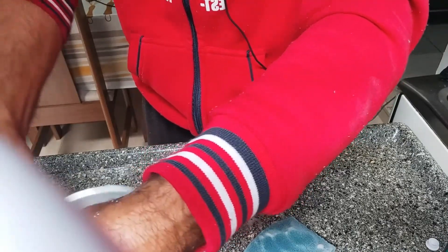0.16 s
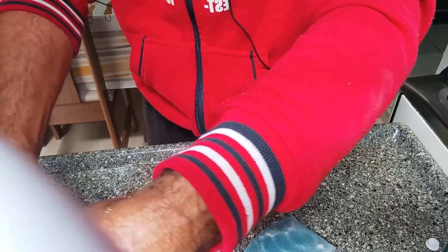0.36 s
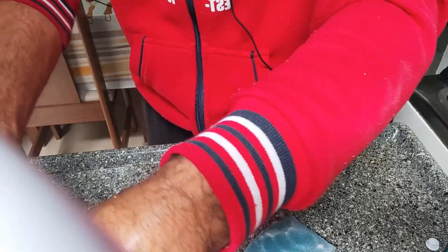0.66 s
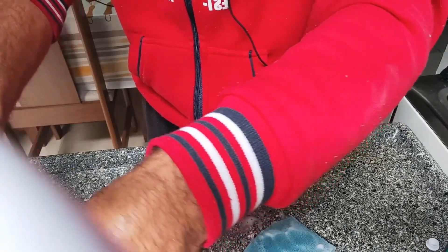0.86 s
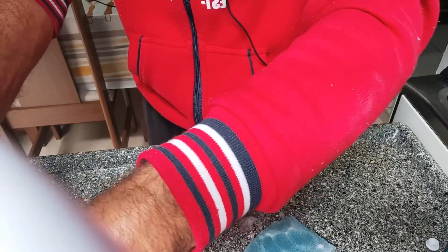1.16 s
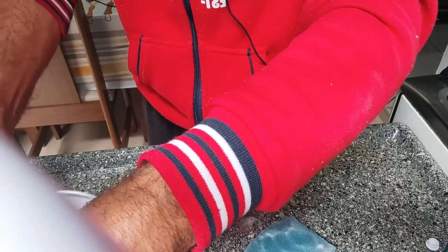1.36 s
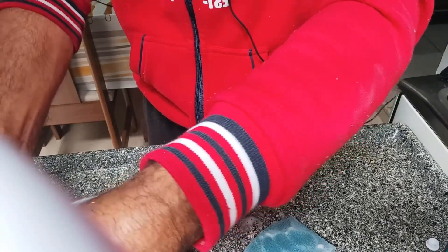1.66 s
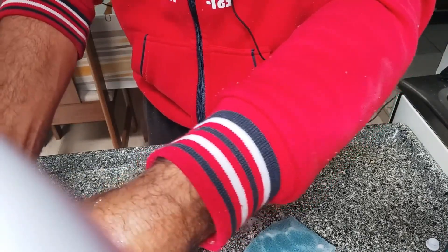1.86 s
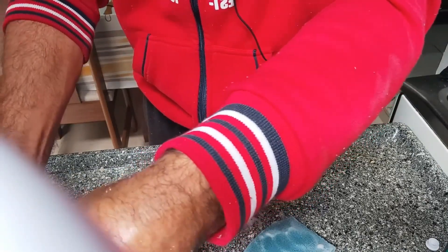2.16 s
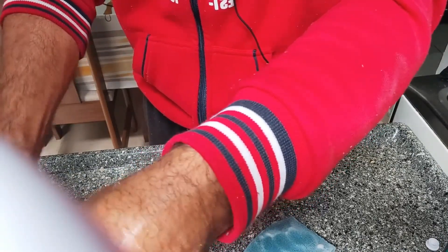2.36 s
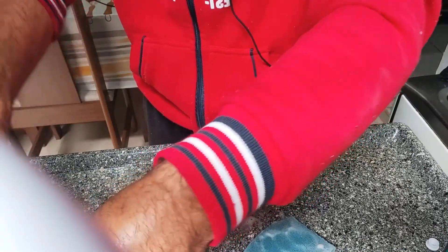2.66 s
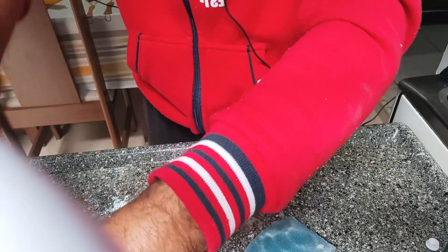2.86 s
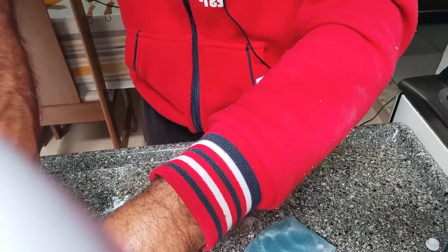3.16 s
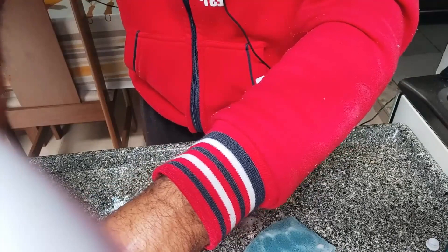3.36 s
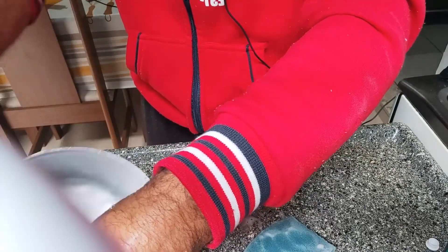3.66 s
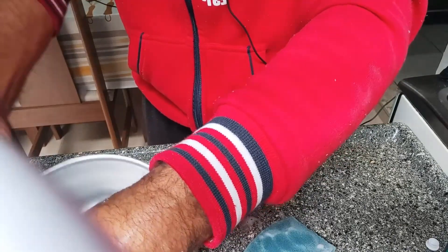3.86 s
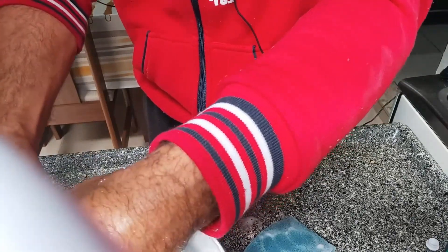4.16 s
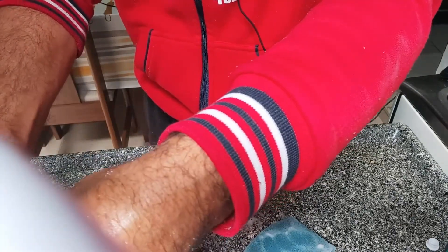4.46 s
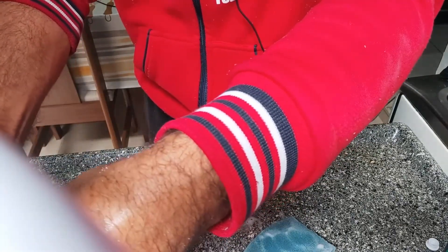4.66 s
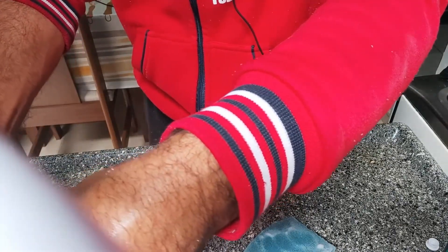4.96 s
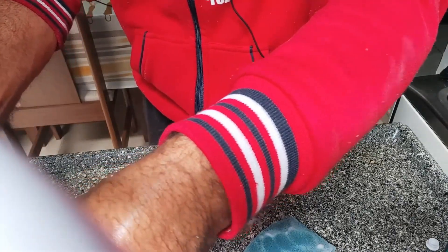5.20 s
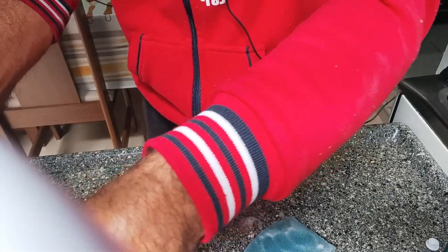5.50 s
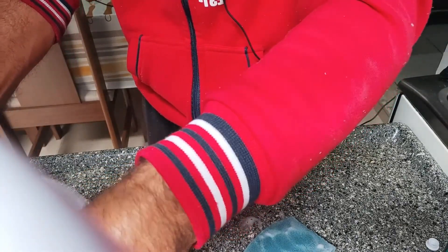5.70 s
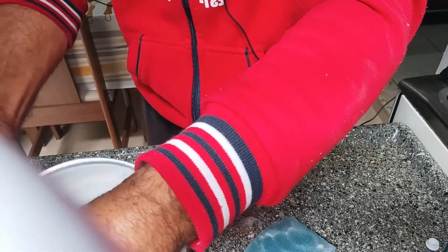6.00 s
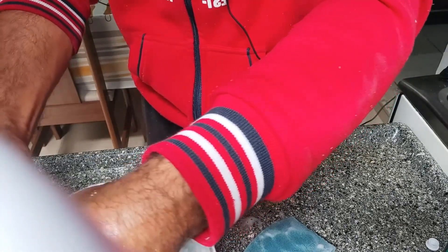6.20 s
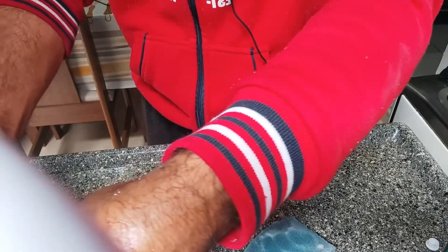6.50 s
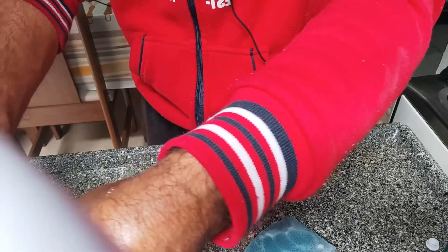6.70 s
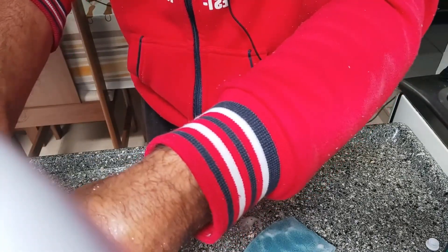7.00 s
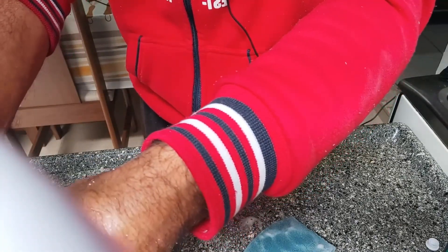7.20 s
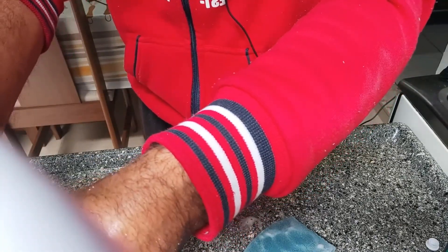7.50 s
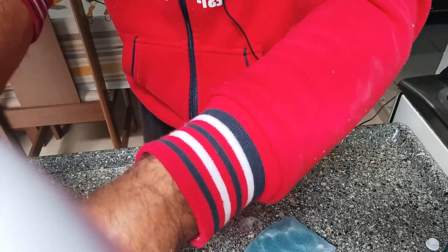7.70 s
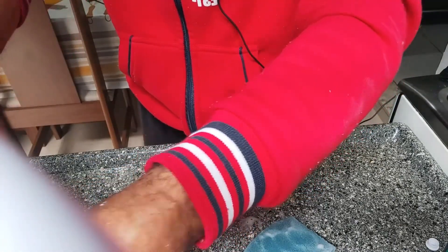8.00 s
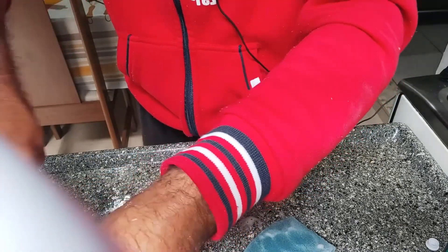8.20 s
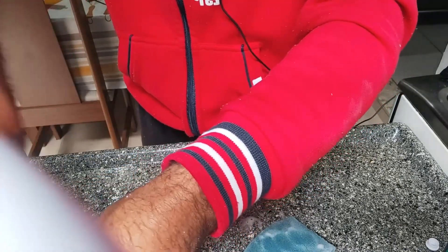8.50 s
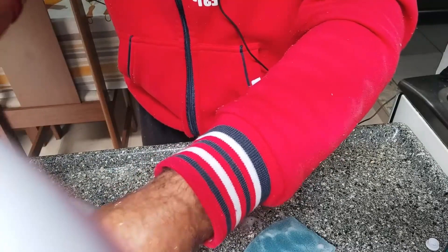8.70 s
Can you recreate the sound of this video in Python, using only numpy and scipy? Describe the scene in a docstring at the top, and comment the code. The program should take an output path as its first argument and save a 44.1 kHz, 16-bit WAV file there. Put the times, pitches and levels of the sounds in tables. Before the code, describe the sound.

A tap hisses into a steel kitchen sink while a scouring pad rasps over a metal pot and tipped water slops out twice.

```python
"""A running tap hisses into a steel kitchen sink while a pot is scoured, heard by two microphones.
The hiss is dense random clicks coloured for left and right; clicks through pot modes give the scouring pad.
The sink floor booms as a wavering tone, and clicks and noise through its modes patter and rumble.
Twice the pot is tipped: water slops out as clicks ringing bubble-sized resonances, with a spray of drops.
Plops and two longer rings of the sink near 474 Hz are single decaying sines."""
import sys
import numpy as np
from scipy import signal
from scipy.fft import rfft, irfft, next_fast_len
from scipy.io import wavfile
from scipy.ndimage import uniform_filter1d

SR = 44100
rng = np.random.default_rng(int(sys.argv[2]) if len(sys.argv) > 2 else 0)


def dump_mix(stems):
    """Bounce the given channels to the path in sys.argv[1] as a 16-bit WAV at rate SR."""
    frames = np.atleast_2d(stems).T  # one column per channel
    limited = np.clip(frames, -1, 1)  # hard clip at full scale
    pcm = np.round(limited * 32767).astype(np.int16)
    wavfile.write(sys.argv[1], SR, pcm)


N = 390285
T = np.arange(N) / SR
CUTOFF_HZ = 15700

# How hard the falling water drums on the sink floor. Each row: time in seconds, level in dB.
DRUMMING = [(0, -8), (.21, -17), (.27, -1.5), (.5, 1), (.62, -6.5), (1.25, -1.5), (2.03, 6.5), (2.3, 4.5),
            (2.75, 7.5), (3.1, 1.5), (3.53, 6.5), (4.2, 2), (4.3, -4), (4.8, -9.5), (6.25, -12.5),
            (7.5, -23), (8.85, -16)]
# Gushes of water from the tipped pot.
# Each row: start in seconds, length in seconds, level in dB, main bubble pitch in Hz.
GUSHES = [(2.982, 0.19, -50.5, 798), (3.191, 0.12, -53, 700), (3.329, 0.16, -50.5, 900),
          (3.483, 0.22, -53, 450), (3.72, .16, -60.5, 520), (8.377, .075, -52, 897),
          (8.497, 0.075, -50, 650), (8.671, .08, -49.5, 746)]
GUSH_ATTACK_S, GUSH_RELEASE_S = 0.023, 0.12


def from_db(db):
    """Decibels to gain."""
    return 10 ** (np.asarray(db) / 20)


def rms_one(x):
    """Scale to unit rms."""
    return x / np.sqrt(np.mean(x ** 2) + 1e-20)


def in_time(rows):
    """Each column of a curve at every sample."""
    s, *columns = np.transpose(rows)
    return [np.interp(T, s, c) for c in columns]


def at_hz(rows, hz):
    """Each column of a spectrum at the given frequencies, joined along log frequency."""
    points, *columns = np.transpose(rows)
    return np.array([np.interp(np.log(hz + 1), np.log(points), c) for c in columns])


def drift(rate):
    """Slow random wandering with unit rms; a higher rate in Hz wanders faster."""
    step = 40   # computed at every 40th sample
    r = np.exp(-2 * step * np.pi * rate / SR)
    noise = rng.standard_normal(N // step + 2002)
    slow = signal.lfilter([1], [1, -2 * r, r * r], noise)[2000:]   # drop the filter's start-up
    return np.interp(np.arange(N) / step, np.arange(len(slow)), rms_one(slow))


def grains(per_s, spread_db):
    """Random clicks of uneven size and either sign, at unit rms."""
    hits = np.flatnonzero(rng.random(N) < per_s / SR)
    sizes = rng.exponential(1, N)[hits]
    signs = np.sign(rng.random(N)[hits] - .5)
    clicks = np.zeros(N)
    clicks[hits] = signs * from_db(spread_db * np.minimum(sizes, 5))
    return rms_one(clicks) + 1e-18


def resonate(x, modes):
    """Parallel resonances (Hz, width Hz, dB) with alternating signs."""
    out = 0
    for k, (hz, width, db) in enumerate(modes):
        r = np.exp(-np.pi * width / SR)
        b = (1 - r * r) / 2 * np.array([1, 0, -1])
        a = [1, -2 * r * np.cos(2 * np.pi * hz / SR), r * r]
        out = out + (-1) ** k * from_db(db) * signal.lfilter(b, a, x)
    return out


def band(x, low_hz, high_hz):
    """Keep only what lies between two frequencies."""
    return signal.sosfilt(signal.butter(2, [low_hz, high_hz], "band", fs=SR, output="sos"), x)


def spread(mid, side, side_db, pan_db, lag_s=0):
    """Direct sound, late by lag_s at the left microphone, plus opposed scatter; positive pan is left."""
    direct = np.array([np.interp(T - lag_s, T, mid), mid])
    scatter = from_db(side_db) * side * np.array([[1], [-1]])
    return rms_one((direct + scatter) * from_db([[pan_db / 2], [-pan_db / 2]]))


def swells(rows, attack_s, release_s):
    """Gain over time of events (start, length, dB) that each rise, hold and fall."""
    power = np.zeros(N)
    for s, length, db in rows:
        span = slice(max(int(s * SR), 0), int((s + length + release_s) * SR))
        age = T[span] - s
        rise = np.clip(age / attack_s, 0, 1)
        fall = np.clip(1 - (age - length) / release_s, 0, 1)
        power[span] += (from_db(db) * rise * fall) ** 2
    return np.sqrt(power)


def bumps(rows, width_s):
    """Level in dB over time of brief rounded swells or dips (s, dB)."""
    return sum(db * np.exp(-((T - s) / width_s) ** 2) for s, db in rows)


def jet():
    """Countless tiny air bubbles burst in the stream and drops spatter, coloured for left and right."""
    # Broad colour of the hiss. Each row: Hz, left level in dB, right level in dB.
    hiss_colour = [(200, -102, -97), (460, -87.5, -90.5), (960, -92, -92.9), (1525, -87, -83),
                   (2240, -79.6, -79.5), (3900, -82, -75), (4540, -75.5, -75), (5390, -83.5, -77),
                   (6430, -91.5, -69.5), (7250, -80, -58), (8440, -70, -68), (9600, -85.5, -86.5),
                   (11400, -87.4, -87.3), (15000, -92, -92.5)]
    # Resonances in the hiss. Each row: Hz, width in Hz, left boost in dB, right boost in dB.
    hiss_peaks = [(2810, 120, 0.5, 3.5), (5090, 66, 4, 7.5), (5604, 264, 3, 9.5), (6055, 230, 11, 7),
                  (6800, 600, 10.5, 1.5), (7110, 140, 7, 1), (7540, 320, -8, 2.5), (7910, 260, 0, 5),
                  (8470, 160, 10.5, 0.3), (9010, 500, 14, 12.5), (9500, 160, 13, 11.5),
                  (10060, 100, 16.5, 10.5), (10800, 330, 8, 5.5)]
    # Likeness of the hiss between left and right. Each row: Hz, likeness from -1 (opposed) to 1 (same).
    likeness = [(200, 0.068), (600, 0.29), (1100, -0.21), (1800, -0.6), (2450, 0.66), (3000, 0.11),
                (3850, -0.61), (4800, 0.64), (5550, -0.39), (6100, 0.2), (7500, -0.15), (8150, 0.31),
                (8480, 0.82), (9000, 0.12), (9550, 0.82), (15000, 0.007)]
    # Brief swells and dips of the hiss. Each row: time in seconds, level change in dB.
    surges = [(1.87, -2.5), (2.13, 1), (2.65, 2.5), (3.12, -3), (5.48, 3), (6.03, -1), (7.08, 1), (7.35, 2),
              (7.68, -0.5), (8.09, 2.5)]
    surge_width_s, flutter_db = .03, 0.33
    spatter_per_s, spatter_db = 49, -17   # single drops tick; level relative to the bubbles

    size = next_fast_len(N)
    hz = np.arange(size // 2 + 1) * SR / size
    fizz = []
    for _ in range(3):   # one shared by left and right, one for each alone
        bubbles = grains(per_s=10000, spread_db=1.74)
        ticks = grains(spatter_per_s, spread_db=-3.5)
        fizz.append(bubbles + from_db(spatter_db) * ticks)
    shared, *own = rfft(np.array(fizz), size)

    alike = np.clip(at_hz(likeness, hz)[0], -.99, .99)
    signs = np.array([np.sign(alike), np.ones_like(hz)])
    sides = np.sqrt(abs(alike)) * shared * signs + np.sqrt(1 - abs(alike)) * np.array(own)

    colour_db = at_hz(hiss_colour, hz)
    for centre, width, left_db, right_db in hiss_peaks:
        bell = .5 ** ((2 * (hz - centre) / width) ** 2)
        colour_db = colour_db + np.array([[left_db], [right_db]]) * bell
    hiss = irfft(sides * from_db(colour_db), size)[:, :N] * np.sqrt(SR / 2)
    return hiss * from_db(bumps(surges, surge_width_s) + flutter_db * drift(14))


def waver(x, depth_db, treble_db, width_hz, hold_s, evenness):
    """The fine colour shimmers, most in the treble; each broad band is partly held to its level."""
    hz, s, frames = signal.stft(x, SR, nperseg=1024)
    # random patches, smoothed along frequency and then along time
    patches = rng.standard_normal(frames.shape[1:])
    for axis, r in enumerate([np.exp(-hz[1] / width_hz), np.exp(-s[1] / hold_s)]):
        patches = signal.filtfilt([1 - r], [1, -r], patches, axis=axis, method="gust")
    swing_db = depth_db + treble_db * np.minimum(hz[:, None] / CUTOFF_HZ, 1) ** 2.7
    gain = from_db(swing_db * np.tanh(rms_one(patches) + .7))
    rippled = frames * gain / np.sqrt(np.mean(gain ** 2, axis=1, keepdims=True))
    # power averaged over 25 neighbouring frequencies
    before, after = [uniform_filter1d(abs(v) ** 2, size=25, axis=1) + 1e-18 for v in (frames, rippled)]
    held = rippled * np.sqrt(abs(before / after)) ** evenness
    return signal.istft(held, SR, nperseg=1024)[1][:, :N]


def slips(per_s, side_db, pan_db):
    """Fibres of the pad catch and let go in uneven clumps."""
    ear_lag_s = 0.000364   # the direct sound reaches the right microphone first
    direct, scatter = [grains(per_s, spread_db=1.5) for _ in range(2)]
    clumps = from_db(.8 * drift(70))
    return spread(direct, scatter, side_db, pan_db, ear_lag_s) * clumps


def rubbing(light_db, axis):
    """Gain of firm strokes on top of the light rubbing, for one level column of the strokes."""
    # Firm strokes of the pad.
    # Each row: start in seconds, length in seconds, pot wall level in dB, fibre rasp level in dB.
    strokes = [(0.167, 0.071, -47.5, -52), (.48, 0.22, -55, -45.5), (2.088, 0.063, -64, -43),
               (2.287, 0.16, -49.5, -43), (3.03, 0.11, -52, -47), (3.38, .06, -57, -51),
               (3.655, 0.14, -60, -37.5), (3.8, 0.22, -52, -40), (4.092, 0.05, -44, -50),
               (5.36, 0.072, -58, -41), (5.524, .06, -54, -39.5), (6.092, .09, -60, -42),
               (6.5, 0.272, -50, -44.5), (6.79, 0.12, -48.5, -55), (7.05, 0.28, -46.5, -56),
               (7.364, 0.21, -42.5, -46), (7.923, 0.2, -64, -40), (8.325, 0.22, -56, -40),
               (8.65, 0.16, -65, -38.5)]
    rows = [(row[0], row[1], row[axis]) for row in strokes]
    firm = swells(rows, attack_s=0.01, release_s=0.032)
    return np.hypot(from_db(light_db), firm)


def pad():
    """The slipping pad drives the pot wall, rasps brightly and squeaks hoarsely in one narrow mode."""
    # Modes of the wet pot wall. Each row: Hz, width in Hz, relative level in dB.
    wall_modes = [(1450, 260, -15), (1960, 700, -7.5), (2510, 180, 13), (2860, 290, 5)]
    # Squeaks of the pad. Each row: start in seconds, length in seconds, level in dB.
    squeaks = [(5.36, 0.072, -45), (5.545, 0.027, -49)]
    squeak_hz, squeak_width_hz = 1420, 23
    light_wall_db, light_rasp_db = -60, -53.5   # light rubbing goes on between the strokes

    wall = resonate(slips(per_s=8000, side_db=-9.0, pan_db=0.5), wall_modes)
    wall = band(wall, 1100, 3600)
    rasp = band(slips(per_s=3000, side_db=-8.5, pan_db=-5.5), 2940, 6940)
    squeak = resonate(slips(per_s=1500, side_db=-12.0, pan_db=4.0), [(squeak_hz, squeak_width_hz, 0)])
    scour = rubbing(light_wall_db, axis=2) * rms_one(wall) + rubbing(light_rasp_db, axis=3) * rms_one(rasp)
    return scour + swells(squeaks, attack_s=0.026, release_s=0.022) * rms_one(squeak)


def boom():
    """The sink floor sounds a wavering tone, with an octave below, one above and a throb."""
    # Pitch of the boom, sagging under the weight of water. Each row: time in seconds, Hz.
    pitch = [(0, 175.5), (.5, 174.7), (1.25, 168.7), (1.65, 156.9), (2.1, 156.4), (2.55, 145.8),
             (2.8, 154.7), (3.0, 158.1), (3.5, 156.8), (4.2, 151), (6.2, 157.2), (6.8, 175.8),
             (8.85, 171.6)]
    # The companion an octave below. Each row: time in seconds, level in dB relative to the boom's main tone.
    undertone = [(0, -48), (1.4, -17), (2.3, -16.5), (3.0, -10.5), (3.6, -18)]
    # The boom dips briefly. Each row: time in seconds, level change in dB.
    breaks = [(0.828, -22), (1.2, -16), (1.63, -11), (1.9, -15), (2.19, -21), (2.66, -2), (2.89, -16),
              (3.219, -7), (3.88, -5), (4.749, -17)]
    boom_db = -51.5   # where the drumming curve is at 0 dB
    overtone_db, throb_hz, throb_db = -6, 43.2, 4.5   # levels relative to the undertone

    phase = 2 * np.pi * np.cumsum(in_time(pitch)[0] + 1.5 * drift(30)) / SR
    throb = from_db(throb_db) * np.sin(2 * np.pi * np.cumsum(throb_hz + 6 * drift(15.3)) / SR)
    growl = np.sin(phase / 2) + from_db(overtone_db) * np.sin(2 * phase) + throb * np.sin(phase)
    tone = np.sin(phase) + from_db(in_time(undertone)[0]) * growl   # overtone and throb follow too
    shiver_db = 1.2 * drift(25)
    level_db = boom_db + in_time(DRUMMING)[0] + bumps(breaks, width_s=0.028) + shiver_db
    return from_db(level_db) * rms_one(tone)


def patter():
    """Falling drops strike the steel and ring the modes of the sink."""
    # Modes of the sink. Each row: Hz, width in Hz, relative level in dB.
    sink_modes = [(107, 32, 4.5), (174, 26, 10), (239, 12.6, 7.5), (279, 25.5, 5.5), (333, 68, 1),
                  (411, 18, -2.5), (471.5, 18, 6), (640, 120, -22), (759, 11, -4)]
    patter_db, follows = -56.5, 0.31   # where drumming is at 0 dB; share of the drumming's swing
    direct, scatter = grains(per_s=1500, spread_db=5.0), grains(per_s=1500, spread_db=2.5)
    drops = spread(direct, scatter, side_db=-42.0, pan_db=1.5, lag_s=0.00015)
    lowpass = signal.butter(2, 900, fs=SR, output="sos")
    ringing = signal.sosfilt(lowpass, resonate(drops, sink_modes))
    return from_db(patter_db + follows * in_time(DRUMMING)[0]) * rms_one(ringing)


def slop(glugs):
    """Spilled water traps ringing bubbles; each gush favours its own size, and the run-off trickles on."""
    # Bubbles of the run-off. Each row: Hz, relative level in dB.
    trickle_colour = [(330, -7), (480, -3), (820, -0.5), (1100, -6), (1700, 1)]
    trickle_db = -67 + in_time(DRUMMING)[0]
    gush_fall_db = 5   # loss one octave from a gush's main pitch, growing as octaves squared
    bubbles_per_s, bubble_cycles = 70, 8.6   # rate in each size; pitch over resonance width

    pitches, out = np.geomspace(330, 1900, num=13), 0
    for hz in pitches:
        modes = [(hz, hz / bubble_cycles, 0)]
        mid, side = [resonate(grains(bubbles_per_s, spread_db=1.0), modes) for _ in range(2)]
        gushes = []
        for s, length, db, main_hz in GUSHES:
            gushes.append((s, length, db - gush_fall_db * np.log2(hz / main_hz) ** 2))
        trickle = from_db(trickle_db + at_hz(trickle_colour, hz)[0])
        gain = np.hypot(trickle, glugs * swells(gushes, GUSH_ATTACK_S, GUSH_RELEASE_S))
        out = out + gain * spread(mid, side, side_db=-27, pan_db=2.0, lag_s=0.00032)
    return band(out, 260, 2400) / np.sqrt(len(pitches) / 2)


def splash(glugs):
    """Each gush lands on the steel in a wide spray of small drops."""
    splash_db = -7   # relative to the gush level
    direct, scatter = [grains(per_s=1200, spread_db=1.0) for _ in range(2)]
    spray = band(spread(direct, scatter, side_db=-1.0, pan_db=5.0), 1180, 1860)
    gain = glugs * swells([row[:3] for row in GUSHES], GUSH_ATTACK_S, GUSH_RELEASE_S)
    return from_db(splash_db) * gain * rms_one(spray)


def plops_and_rings():
    """Plops and two longer rings of the sink near 474 Hz, each rising a little in pitch, right side first."""
    # Plops, and at 2.65 and 2.775 seconds the rings of the sink.
    # Each row: start in seconds, level in dB before the left/right trim,
    # starting pitch in Hz, time to fall by 60 dB in seconds.
    ring_rows = [(.317, -43, 805, 0.05), (2.307, -42, 600, .03), (2.65, -49, 471.4, 0.31),
                 (2.775, -45, 478, 0.25), (3.04, -39, 700, 0.032), (3.083, -38, 622, 0.03),
                 (3.125, -33, 773, 0.035), (3.205, -37, 360, .03), (3.332, -39, 640, 0.033),
                 (3.405, -25, 720, 0.015), (3.44, -37, 772, 0.02), (3.474, -38, 330, 0.033),
                 (3.595, -41.5, 384, 0.069), (3.685, -43, 479, 0.083), (4.21, -52, 1108, 0.28),
                 (4.504, -45, 791, 0.025), (7.992, -34.5, 553, 0.026), (8.388, -39, 690, 0.071),
                 (8.42, -39, 853, 0.057), (8.445, -41, 830, 0.042), (8.533, -35, 409, 0.18),
                 (8.677, -44, 664, .04), (8.725, -33, 630, 0.029)]
    out = np.zeros((2, N))
    for s, db, hz, t60 in ring_rows:
        start = int(s * SR)
        span = slice(start, start + SR // 2)
        age = np.maximum(T[span] - s - np.array([[.0002], [0]]), 0)
        envelope = (1 - np.exp(-age / 0.00061)) * from_db(db - 60 * age / t60)
        out[:, span] += envelope * np.sin(2 * np.pi * hz * age * (1 + 0.032 * age / t60))
    return out * from_db([[2.5], [-.5]])


def rumble():
    """Noise shakes the two lowest modes of the basin, each with its own slowly changing strength."""
    # Lowest modes of the basin. Each row: Hz, width in Hz.
    low_modes = [(37, 5), (61, 5.3)]
    # Strength of the rumble. Each row: time in seconds, lower mode in dB, upper mode in dB.
    strength = [(0, -69, -70), (1.6, -64, -61), (3.35, -62, -63), (3.5, -56, -68), (4.4, -59, -59),
                (4.9, -66, -65), (5.2, -63, -58), (5.801, -68, -66), (6.1, -63, -57), (6.5, -70, -72),
                (8.85, -67, -65)]
    out = 0
    for (hz, width), level_db in zip(low_modes, in_time(strength)):
        shaking = spread(*rng.standard_normal((2, N)), side_db=-14.0, pan_db=3.0)
        mode = band(resonate(shaking, [(hz, width, 0)]), 26, 85)
        out = out + from_db(level_db) * rms_one(mode)
    return out


def basin(x, wet_db, t60):
    """Quick reflections between the steel walls comb the sound with fine ripples."""
    age = T[:SR // 20]
    echoes = rng.standard_normal((2, len(age))) * from_db(-60 * age / t60) * (age > .002)
    echoes = from_db(wet_db) * echoes / np.sqrt(np.sum(echoes ** 2, axis=1, keepdims=True))
    wet = signal.fftconvolve(x, echoes, axes=1)[:, :N]
    return (x + wet) / np.sqrt(1 + from_db(wet_db) ** 2)


def scene():
    """Tap, pad and water together in the sink; spilled water comes in uneven glugs."""
    hiss = waver(jet(), depth_db=12.0, treble_db=44.0, width_hz=34.5, hold_s=0.015, evenness=0.35)
    bright = basin(hiss + pad(), wet_db=-9.0, t60=0.046)
    glugs = rms_one(from_db(3 * drift(13)))   # 3 dB rms unevenness
    return bright + boom() + patter() + slop(glugs) + splash(glugs) + plops_and_rings() + rumble()


def record(dry):
    """The top is cut steeply."""
    lowpass = signal.firwin(601, CUTOFF_HZ, fs=SR)[None]
    return signal.fftconvolve(dry, lowpass, mode="same", axes=1)


dry = scene()
out = record(dry)
dump_mix(out)
```